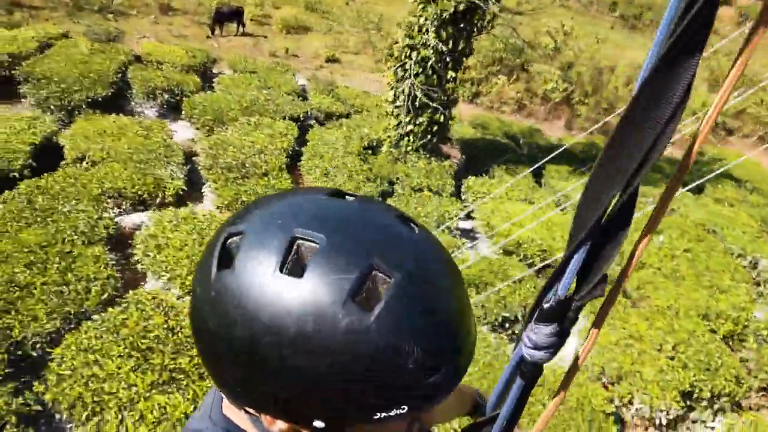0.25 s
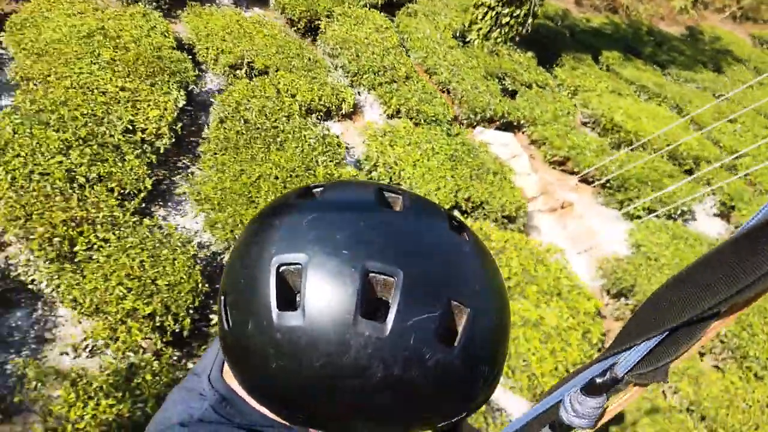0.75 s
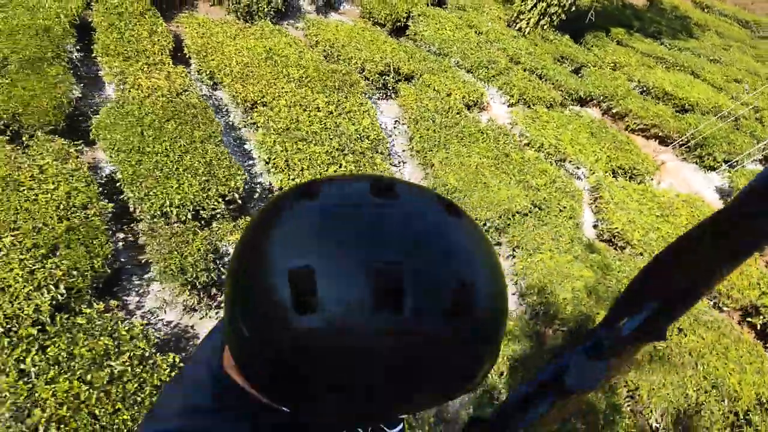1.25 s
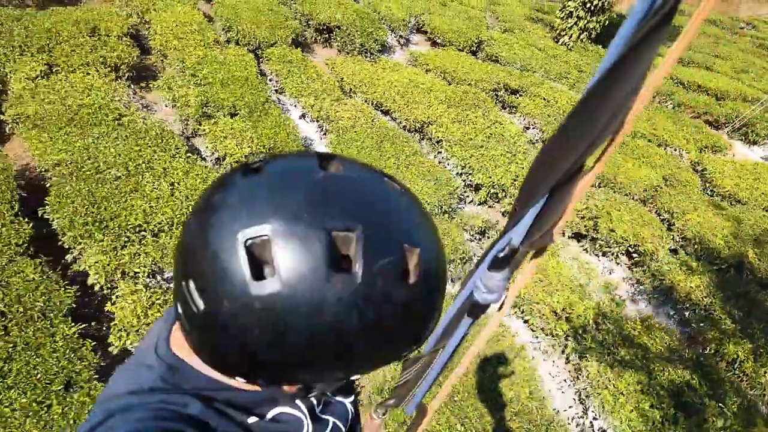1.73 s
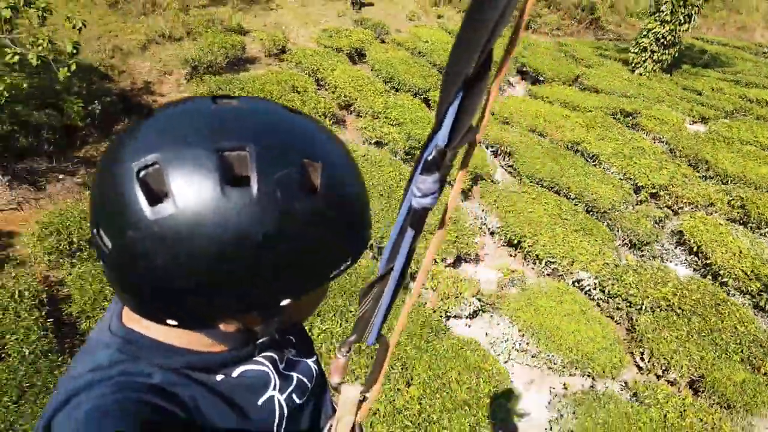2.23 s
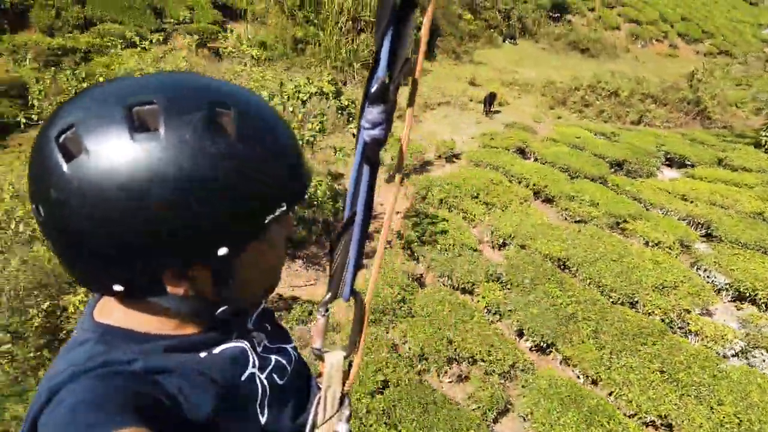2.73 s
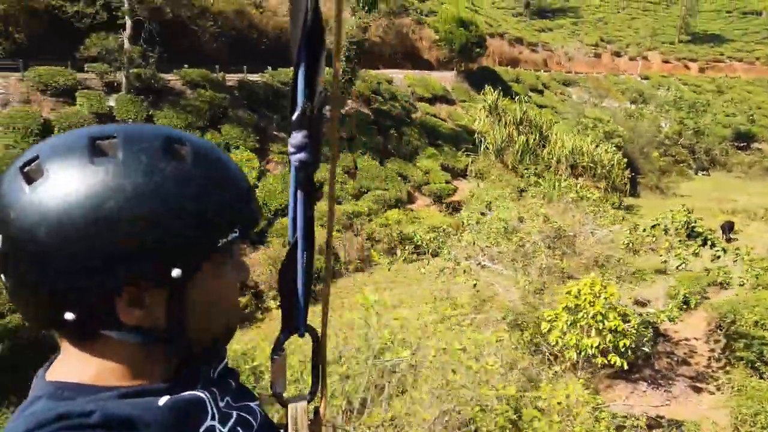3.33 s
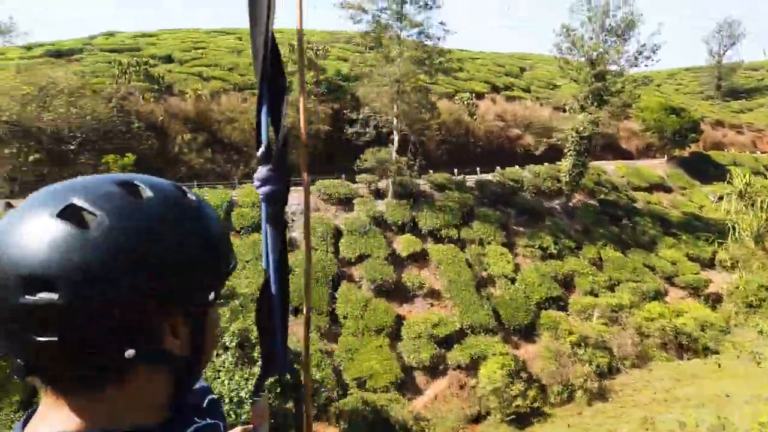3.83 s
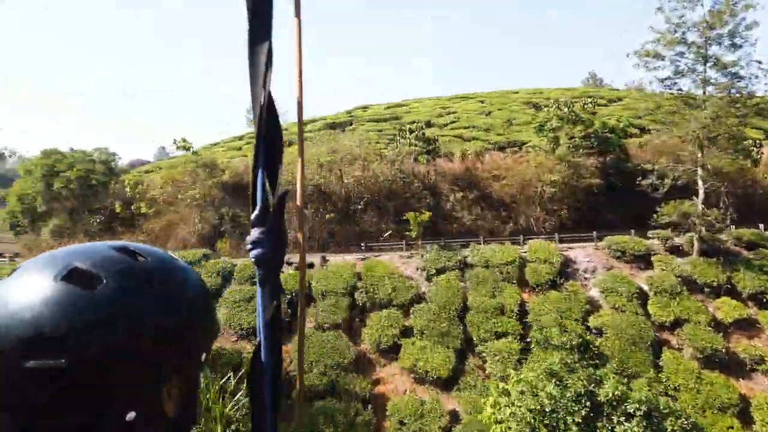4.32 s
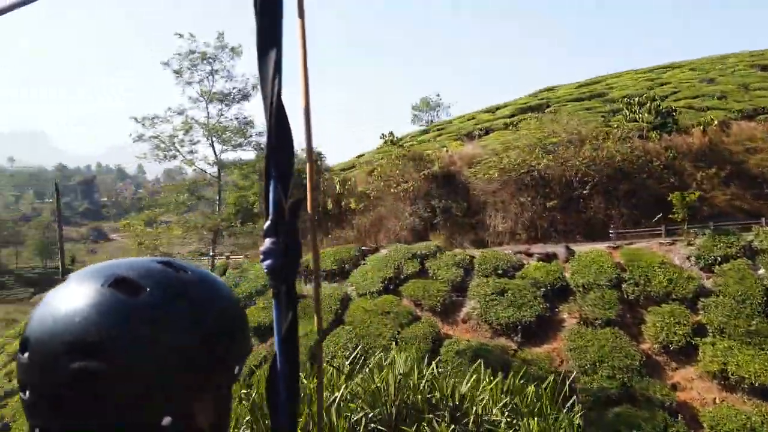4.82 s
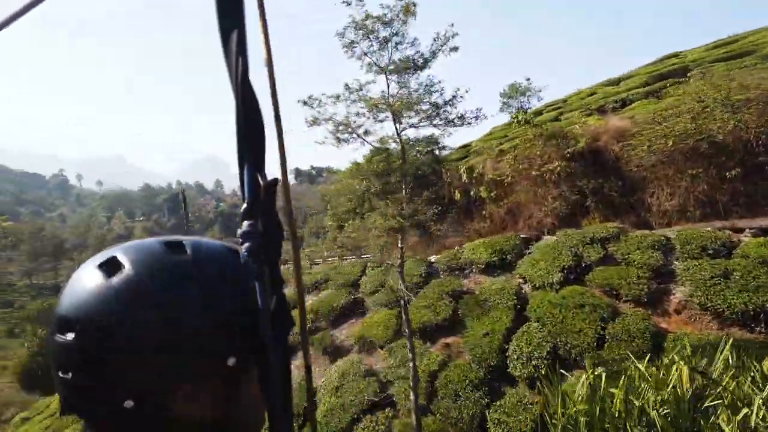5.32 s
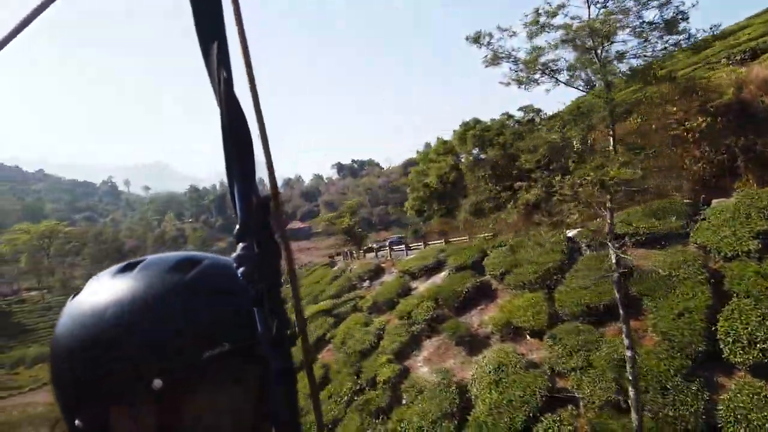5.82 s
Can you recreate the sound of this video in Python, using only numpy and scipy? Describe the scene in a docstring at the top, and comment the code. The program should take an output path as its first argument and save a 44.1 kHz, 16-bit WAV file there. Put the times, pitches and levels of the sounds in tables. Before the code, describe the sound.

Riding a zipline in open air: an unbroken, sizzling metallic hiss, wide in stereo, its colour shifting as the microphone turns. It opens under low thuds and fluttering wind, heavier on the right. After about a second the air calms, leaving hiss and a high wavering whine with a faint lower tone creeping upward. In the last second gusts thump the microphone again.

```python
"""A bright rolling hiss and thudding wind come first, then a many-toned whine as the wind drops; it returns late.
A pulley trolley rolls along a stranded steel cable above a hand-held camera that is slowly turned.
Rolling: white noise shaped by resonances of the trolley frame and camera body, with a phase at each port.
Whine: sines at whole multiples of the rate of cable lay, and one more that rises.
Wind: coloured noise in four lumpy layers, with flaps of air, at two microphone ports facing the stream."""
import sys
import numpy as np
from scipy import signal
from scipy.io import wavfile
from scipy.ndimage import uniform_filter1d

SR = 44100
rng = np.random.default_rng(int(sys.argv[2]) if len(sys.argv) > 2 else 0)


def bounce(signal):
    """Save signal as a 16-bit WAV file at the path given by the first command-line argument."""
    frames = np.transpose(np.atleast_2d(signal))
    limited = np.clip(frames, -1, 1)
    pcm = np.round(limited * 32767).astype(np.int16)
    wavfile.write(sys.argv[1], SR, pcm)


N = 267422
SIZE, HOP = 1024, 256  # samples in a short-time spectrum and between two of them
HZ, TIMES = np.fft.rfftfreq(SIZE, 1 / SR), np.arange(N // HOP + 5) * HOP / SR
T = np.arange(N) / SR

# turning of the camera: start_s, pose (held within 0 to 5)
CAMERA_POSE = [(0, -1.5), (.55, 0), (.95, 0), (1.35, 4), (1.8, 1.5), (2.38, 2.5), (2.52, 3), (3.2, 4.5),
               (3.8, 3.5), (4.5, 4.5), (4.8, 4), (5.2, 4.5), (6.06, 7)]
# strength of the rolling noise: start_s, level_db
ROLLING = [(0, -30), (0.65, -31), (0.79, -32.5), (0.9, -29), (1.15, -29.5), (1.36, -31), (1.5, -29),
           (1.85, -27.5), (2.45, -28), (2.8, -27.5), (3.05, -29), (3.5, -30), (4.2, -31), (4.4, -29.5),
           (5.2, -30.5), (5.6, -32.5), (6.06, -32)]
# brief dips of the hiss near 5 kHz: centre_s, depth_db
HISS_DIPS = [(1.81, 12), (1.978, 14), (2.178, 20), (2.294, 7)]
DIP_HZ, DIP_WIDTH_HZ, DIP_LENGTH_S = 5100, 2600, 0.031
# the hiss flares once as the camera swings
SURGE_S, SURGE_DB, SURGE_LENGTH_S, SURGE_HZ, SURGE_WIDTH_HZ = 1.27, 7, 0.06, 7600, 5100


def rolling_hiss():
    """Source-filter principle: broadband rolling noise excites resonances, partly coherent at the ports."""
    power, cross = resonances_and_ports(HZ, *curves(CAMERA_POSE, TIMES))
    db = curves(ROLLING, TIMES)[0]
    db = db + SURGE_DB * band(SURGE_HZ, SURGE_WIDTH_HZ) * bump(TIMES, SURGE_S, SURGE_LENGTH_S)
    # uneven rolling: narrow slow patches and broad quick ones, in dB rms
    db = db + 2.02 * patches(bins=4, frames=24) + 1.34 * patches(bins=100, frames=4)
    dips_db = sum(depth_db * bump(TIMES, s, DIP_LENGTH_S) for s, depth_db in HISS_DIPS)
    db = db - band(DIP_HZ, DIP_WIDTH_HZ) * dips_db

    coherence = cross / power
    left = noise()
    unrelated = np.sqrt(np.clip(1 - abs(coherence) ** 2, 0, 1))
    right = coherence.conj() * left + unrelated * noise()
    unit = np.sqrt(np.mean(sound(left) ** 2) / len(HZ))  # rms of a spectrum whose powers sum to 1
    colour = np.sqrt(power / power.sum(0))
    return sound(np.array([left, right]) * colour * gain_of(db)) / unit


# resonances of trolley and camera body: centre_hz, width_hz, level_db in each of poses 0 to 5
FRAME_RESONANCES = [(1540, 1480, -17.5, -49, -19, -22, -19, -36), (2540, 950, -34, -22, -17, -19, -6, -16),
                    (3028, 960, -4, 3.5, -7.5, -8, -4, -4), (3940, 1160, -2.5, -2, -7, -4.5, -12.5, -5.5),
                    (4636, 850, -1.5, 4, -5, -1.5, -5, -1), (5290, 1060, 0, 2, -9.5, -6.5, -1, -3),
                    (6220, 1140, -1, 1, -11, -10.5, -6, 0), (7220, 1100, -8, 1, -3.5, -9, -8, -6.5),
                    (8170, 670, -3.5, 9, -5, -5.5, -8, -3.5), (8680, 560, -14, -18, 3, -0.5, -11.5, -6.5),
                    (9360, 1800, -13.5, -36, -2, -11.5, -9.5, -19),
                    (10570, 1500, -11, -3, -6.5, -0.5, -15.5, -11),
                    (11500, 890, -17, -10, -7, -21, -10, -7), (12020, 730, -1.5, -12, -2, -7.5, -8.5, -3.5),
                    (12830, 1000, -22, 3, -13, -30, -6.5, -4.5), (13400, 1500, -8, -20, -19, -23, -23, -19),
                    (14800, 1600, -14, -16, -10, -10.5, -23, -18),
                    (16140, 1100, -28, -29, -14.5, -25, -8, -16)]
# arrival at the two ports: centre_hz, left_lead_rad in each of poses 0 to 5, coherence (0 to 1)
PORT_PHASES = [(1500, 0.5, 0.5, 0.6, 1.1, 1.2, 0.6, 0.85), (2100, 0.8, 0.1, 0.4, 0.9, 0.9, 0.6, 0.67),
               (2500, 1.1, 1.1, 1.4, 1.3, 1.2, 0.7, 0.76), (3000, 1.5, 1.6, 2.3, 1.7, 1.4, 1.4, 0.87),
               (3500, 2, 2.2, 2, 2, 1.6, 2, 0.4), (3900, 2.5, 2.5, 3, 3.2, 2.5, 2.5, 0.25),
               (4300, -3.1, -3.1, -3.0, -3.1, -3.1, -3.0, 0.9),
               (4700, -1.9, -2.8, -2.9, -2.5, -2.6, -2.0, 0.83),
               (5100, -1.6, -2.3, -0.3, -1.8, -2.2, -2.0, 0.77),
               (5600, -1.8, -1.5, 0.1, -1.0, -1.7, -1.3, 0.68),
               (6200, -1.3, -0.1, 0.4, -0.2, -0.4, -0.8, 0.86),
               (6800, -0.5, 0.1, 1.8, 0.1, 0.1, -0.1, 0.87), (7400, 0.2, 0.7, 2.2, 1.8, 0.6, 0.4, 0.63),
               (7900, 3.1, 0.1, 1.6, 1.6, 0.1, 2.8, 0.66), (8300, -2.9, -3.0, -3.5, -3.5, -3.2, -3.0, 0.87),
               (8700, -2.6, -2.9, -3.4, -3.5, -3.0, -2.8, 0.86),
               (9100, -1.1, -2.2, -2.2, -2.2, -2.2, -2.6, 0.4),
               (9600, -0.3, -0.1, -0.0, 0.0, -0.5, -1.3, 0.72),
               (10200, -0.1, -0.3, -0.3, -0.2, -0.2, -0.0, 0.86),
               (10800, -0.0, -0.1, -2.2, -0.1, -0.2, -0.0, 0.92),
               (11500, 0.2, 0.0, -0.8, 0.5, -0.5, 0.5, 0.86),
               (12200, 0.7, -0.1, -0.7, 1.1, -0.4, 0.2, 0.89),
               (13000, 0.0, -0.0, -0.1, 0.1, -0.0, 0.2, 0.96),
               (14000, 0.0, 0.0, -0.0, 0.1, 0.0, -0.0, 0.99), (14800, 1.5, 0.2, -0.9, 2.2, 1.4, 0.3, 0.69),
               (15500, 0.3, -0.0, -0.3, -0.1, 0.1, 0.0, 0.56)]


def resonances_and_ports(hz, pose):
    """Modal superposition: power and left-right cross power at hz (rows) for each pose (columns)."""
    frame, ports, poses = np.array(FRAME_RESONANCES), np.array(PORT_PHASES), np.arange(6)
    offset = 2 * (hz[:, None] - frame[:, 0]) / frame[:, 1]
    shape = 1 / (1 + offset ** 2) ** 2
    power = shape @ np.array([gain_of(np.interp(pose, poses, row[2:])) ** 2 for row in frame])
    coherence = np.array([row[-1] * np.exp(1j * np.interp(pose, poses, row[1:-1])) for row in ports])
    between = np.array([np.interp(hz, ports[:, 0], one) for one in np.eye(len(ports))]).T
    return power, power * (between @ coherence)


# turns of the cable lay passing the wheel, as the ride slows: start_s, lay_rate_hz
LAY_RATE = [(0, 131.4), (1.1, 129.9), (1.4, 130.0), (2.3, 128.8), (2.7, 127.9), (3.4, 126.95), (3.6, 127.1),
            (3.8, 126.5), (4.1, 126.7), (4.4, 126.0), (4.6, 125.2), (5.0, 125.05), (5.3, 124.9),
            (6.06, 123.6)]
# strand orders: order (multiple of the lay rate), level_db (before the levels over time)
STRAND_ORDERS = [(6, -58), (10, -63), (11, -56), (12, -47), (13, -58), (18, -52), (19, -51), (22, -50),
                 (23, -45), (24, -46), (25, -47), (29, -55), (30, -52), (36, -49), (37, -48), (40, -50),
                 (42, -48), (43, -48)]
# levels over time: start_s, low_orders_db, high_orders_db, rising_whine_db
WHINE_LEVELS = [(0, -15, -9, -49), (.6, -9.5, -9, -55), (1.15, -10.5, -3.5, -57.5), (1.4, -7.5, -8, -56),
                (1.8, -4, -9, -53), (2.1, -8, -7, -55), (2.5, -10, -4.5, -52.5), (2.75, -2.5, -0.5, -49.5),
                (3.0, -3, -4.5, -48), (3.25, 0.5, 0, -42.5), (3.4, 0, -4, -49.5), (3.6, 1, -3, -43.5),
                (3.75, -1, -1.5, -46.5), (4.0, -4, -3.5, -51), (4.3, -5, -8, -48), (4.65, -1, -5, -49),
                (5.0, -8, -4.5, -55.5), (5.35, -14.5, -13.5, -57), (6.06, -12, -6, -53)]
HIGH_ORDER = 15  # the high orders start here
WHINE_FUZZ_RAD, WHINE_WAVER_DB, HIGH_WAVER_DB = .3, 1.2, 2.2  # rms wander of phase and level
# a narrow resonance lifts nearby orders and shifts as the camera turns: start_s, centre_hz
MOVING_RIDGE = [(0, 3130), (1, 3140), (2.2, 3200), (2.7, 3050), (3.3, 3020), (3.8, 2830), (4.4, 2820),
                (5, 2930), (6.06, 3000)]
RIDGE_DB, RIDGE_WIDTH_HZ = 4, 260
# the rising whine: start_s, pitch_hz
RISING_PITCH = [(0, 712), (1, 724), (1.8, 741), (3.45, 762), (4.5, 765), (6.06, 786)]
# the rising whine crosses to the right: start_s, left_minus_right_db
RISING_BALANCE = [(2.4, 5), (3.4, 0), (4.7, -0.5), (5.2, -14)]
# brief drops of the rising whine: centre_s, depth_db
RISING_BREAKS = [(1.42, 16), (1.93, 12), (2.27, 10), (3.14, 12), (3.69, 8), (4.09, 14), (4.38, 14),
                 (4.76, 12), (4.84, 12)]
BREAK_LENGTH_S = 0.05


def cable_whine():
    """Order excitation: periodic strands sound multiples of the lay rate, with port phases as in the hiss."""
    order, order_db = np.transpose(STRAND_ORDERS)
    low_db, high_db, rising_db = curves(WHINE_LEVELS, T)
    rising_db = rising_db - sum(db * bump(T, s, BREAK_LENGTH_S) for s, db in RISING_BREAKS)
    speed_waver = 1 + .0005 * np.interp(T, TIMES, drift(6, TIMES))
    lay = curves(LAY_RATE, T)[0] * speed_waver
    cross = resonances_and_ports(order * lay.mean(), *curves(CAMERA_POSE, TIMES))[1]
    lead = [np.interp(T, TIMES, row) for row in np.unwrap(np.angle(cross))]

    # the rising whine borrows most of the lowest order's phase lead
    rising = tone(*curves(RISING_PITCH, T), rising_db, .8 * lead[0], fuzz=.35, waver_db=.7)
    out = rising * gain_of(np.outer([.5, -.5], *curves(RISING_BALANCE, T)))
    ridge_hz = curves(MOVING_RIDGE, T)[0]
    for k, k_db, k_lead in zip(order, order_db, lead):
        db, waver_db = (low_db, WHINE_WAVER_DB) if k < HIGH_ORDER else (high_db, HIGH_WAVER_DB)
        db = db + RIDGE_DB * bump(k * lay, ridge_hz, RIDGE_WIDTH_HZ)
        out += tone(k * lay, db + k_db, k_lead, WHINE_FUZZ_RAD, waver_db)
    return out


def tone(hz, db, lead, fuzz, waver_db):
    """Phase accumulation: a wavering sine of rms level db, the left port ahead by lead radians."""
    wander = fuzz * drift(25, T[::64]).repeat(64)[:N]
    turn = 2 * np.pi * (np.cumsum(hz) / SR + rng.random()) + wander
    level = np.sqrt(2) * gain_of(db + waver_db * np.interp(T, TIMES, drift(14, TIMES)))
    return level * np.sin([turn + lead / 2, turn - lead / 2])


# sharpest flaps, before their envelope and the balance of the ports: start_s, level_db
SHARP_FLAPS = [(0.019, -25), (0.085, -29), (0.118, -23), (0.188, -28), (0.205, -25), (0.231, -36),
               (0.286, -23.5), (0.400, -25), (0.432, -27.5), (0.461, -33), (0.492, -28), (0.533, -35),
               (0.55, -26.5), (0.572, -30), (0.585, -43), (0.729, -34.5), (0.82, -29.5), (0.87, -28),
               (0.931, -44), (5.132, -32.5), (5.169, -36), (5.377, -31), (5.399, -31.5), (5.567, -36),
               (5.602, -24), (5.663, -25), (5.676, -24.5), (5.742, -35), (5.774, -27.5), (5.851, -29.5),
               (5.908, -24), (5.964, -26.5), (5.998, -27), (6.014, -23)]
# colour of the rustle: frequency_hz, relative_level_db (per Hz)
FLAP_COLOUR = [(100, -5), (300, -1.5), (800, -0.5), (1600, -10), (2600, -13.5), (5000, -55)]
SMALL_FLAPS_PER_S, SMALL_FLAP_DB = 30, -8.5  # lesser flaps come by chance, this far under the buffeting
POP_S, POP_DB = 0.00261, 12  # time scale of the pop, and its strength before the balance of the ports


def air_flaps():
    """Impulsive excitation: a pop of pressure, push or pull, and a rustle; the left port is sheltered."""
    t = np.arange(1500) / SR
    by_chance = rng.random(N) < SMALL_FLAPS_PER_S / SR
    hits = gain_of(curves(WIND_STREAM, T)[1] + SMALL_FLAP_DB) * by_chance
    s, db = np.transpose(SHARP_FLAPS)
    hits[(s * SR).astype(int)] = gain_of(db)

    rustle_shape = (1 - np.exp(-t / 0.0015)) * np.exp(-t / 0.0082)
    u = (np.pi * (t - POP_S) / POP_S) ** 2
    pop_shape = gain_of(POP_DB) * (1 - u) * np.exp(-u)  # one swing with a dip on either side
    pops = signal.oaconvolve(hits * rng.choice([-1., 1.], N), pop_shape)[:N]
    colour = gain_of(read(FLAP_COLOUR, HZ))[:, None]
    air = evened(sound(np.array([colour * noise(), colour * noise()])))
    rustle = air * signal.oaconvolve(hits, rustle_shape)[:N]
    return gain_of([[-1], [2]]) * rustle + gain_of([[-7], [-1]]) * pops  # dB of left, right


# the ports turn out of the air stream and back into it: start_s, rumble_db, buffeting_db
WIND_STREAM = [(0, -28, -27.5), (.55, -50, -29), (.66, -32, -36), (.78, -30.5, -31), (1.0, -37, -32),
               (1.09, -52, -35.5), (1.16, -52, -42), (1.21, -51, -53), (1.5, -56, -51), (2.0, -54.5, -57.5),
               (3.3, -52.5, -62.5), (4.7, -56.5, -70), (5.03, -47.5, -68), (5.12, -46, -37),
               (5.3, -31, -42), (5.5, -33, -32.5), (5.65, -31, -29), (5.8, -34.5, -27.5),
               (6.06, -35, -33.5)]
# single gusts added to the power of the stream: centre_s, rumble_db, buffeting_db
WIND_GUSTS = [(.4, -27, -35), (0.569, -44, -25.5), (.885, -32, -29.5), (1.49, -62, -51), (2.23, -43, -54),
              (2.53, -62, -47), (2.97, -50, -70), (3.19, -45, -48), (3.39, -47, -63), (4.03, -48, -58),
              (4.22, -51, -62), (4.794, -32, -49.5), (5.18, -30, -40.5), (5.39, -38, -30),
              (5.605, -36, -28.5), (5.685, -38, -45), (5.89, -27, -30), (6.009, -34, -27)]
GUST_RISE_S, GUST_FALL_S, GUST_TOP_SHARE = 0.03, 0.032, 1.5
# the hissy top follows the buffeting by a share, from its full level
TOP_DB, TOP_FOLLOWS, BUFFET_FULL_DB = -43.5, 0.62, -23.5


def wind_levels():
    """Energy addition: stream and gust powers sum to the dB of rumble and buffeting, which the top follows."""
    stream = np.array(curves(WIND_STREAM, TIMES))
    power = gain_of(stream) ** 2
    for s, *gust_db in WIND_GUSTS:
        shape = bump(TIMES, s, 2 * np.where(TIMES < s, GUST_RISE_S, GUST_FALL_S))
        power = power + np.outer(gain_of(gust_db) ** 2, shape)
    rumble, buffet = 10 * np.log10(power)
    gust_lift = buffet - stream[1]
    top = TOP_DB + TOP_FOLLOWS * (stream[1] - BUFFET_FULL_DB) + GUST_TOP_SHARE * TOP_FOLLOWS * gust_lift
    return [np.interp(T, TIMES, db) for db in (rumble, buffet, top)]


# colours of the four layers, each: frequency_hz, relative_level_db (per Hz)
RUMBLE_COLOUR = [(10, -7), (25, 7.5), (50, -10.5), (100, -14.5), (150, -12), (300, -23), (1000, -98)]
BUFFET_COLOUR = [(50, -0.5), (110, 2.5), (200, 3.5), (350, 0), (550, -8), (800, -18.5), (1500, -25),
                 (4000, -82)]
TOP_COLOUR = [(200, -1), (600, 2), (900, -1), (1350, -11.5), (2000, -19.5), (2800, -3.5), (4000, -26),
              (8000, -82)]
SWAY_COLOUR = [(10, -11.5), (30, -7), (55, -11), (120, -37), (1000, -90)]
SWAY_DB = -52.5  # the low sway of the air never stops
# difference between the ports: frequency_hz, side_minus_mid_db
WIND_SIDE_LEVEL = [(50, 0), (110, -1), (200, -4), (400, -5), (800, -3), (1500, -3)]


def wind():
    """Turbulent pressure fluctuation: four noise layers, lumpy together, partly unrelated at the ports."""
    shared, *own = uniform_filter1d(uniform_filter1d(rng.standard_normal((3, N)), 260), 260)
    lumps = evened(shared + 0.88 * np.array(own))  # eddies strike each port a little differently
    rumble_db, buffet_db, top_db = wind_levels()
    # colour, level in dB, lumpiness in dB rms, dB raised on the right and lowered on the left
    layers = [(RUMBLE_COLOUR, rumble_db, 1.9, 0.15), (BUFFET_COLOUR, buffet_db, 2.54, .3),
              (TOP_COLOUR, top_db, 4.2, 0.2), (SWAY_COLOUR, SWAY_DB, 4, 0)]
    side_gain = gain_of(read(WIND_SIDE_LEVEL, HZ))[:, None]
    out = np.zeros((2, N))
    for spectrum, db, lumpy_db, pan_db in layers:
        colour = gain_of(read(spectrum, HZ))[:, None]
        mid, side = sound(np.array([colour * noise(), colour * side_gain * noise()]))
        scale = evened(gain_of(lumpy_db * lumps)) * gain_of(db) / np.sqrt(np.mean(mid ** 2))
        out += scale * gain_of([[-pan_db], [pan_db]]) * np.array([mid + side, mid - side])
    return out


def gain_of(db):
    """Decibel law: the amplitude ratio of a level."""
    return 10 ** (np.asarray(db) / 20)


def evened(x):
    """Normalisation to an rms of 1."""
    return x / np.sqrt(np.mean(abs(x) ** 2) + 1e-20)


def read(points, hz):
    """Interpolation of a spectrum, straight on a log-frequency axis."""
    f, value = np.transpose(points)
    return np.interp(np.log(hz + 1), np.log(f + 1), value)


def curves(rows, t):
    """Linear interpolation over time of each column after the first."""
    s, *columns = np.transpose(rows)
    return [np.interp(t, s, c) for c in columns]


def drift(rate, t):
    """Random-phase superposition: slow chance of rms 1, from sines up to rate in Hz."""
    rates = np.geomspace(rate / 12, rate, num=24)
    return evened(sum(np.sin(2 * np.pi * (f * t + rng.random())) / f ** 0.013 for f in rates))


def noise():
    """White noise: independent Gaussian values in every bin and frame."""
    a, b = rng.standard_normal((len(TIMES), len(HZ), 2)).T
    return a + 1j * b


def patches(bins, frames):
    """Moving average: a random field, smooth over so many bins and frames."""
    field = rng.standard_normal((len(TIMES), len(HZ))).T
    return evened(uniform_filter1d(uniform_filter1d(field, round(bins), 0), round(frames), 1))


def sound(z):
    """Overlap-add synthesis: short-time spectra become a waveform."""
    return signal.istft(z, nperseg=SIZE, noverlap=SIZE - HOP)[1][..., :N]


def bump(t, s, length):
    """Gaussian window: a smooth swell of height 1 around s."""
    return np.exp(-(2 * (t - s) / length) ** 2)


def band(hz, width_hz):
    """Super-Gaussian window: a flat-topped band of height 1."""
    return np.exp(-((2 * (HZ[:, None] - hz) / width_hz) ** 2) ** 2)


def scene():
    """Linear superposition of the trolley, the cable and the moving air."""
    return rolling_hiss() + cable_whine() + wind() + air_flaps()


def record(dry):
    """Low-pass filtering: the band limit of the recorder."""
    lowpass = signal.firwin(1023, 15740, window=("kaiser", 9), fs=SR)  # edge in Hz
    return signal.oaconvolve(dry, lowpass[None], "same")


dry = scene()
out = record(dry)
bounce(out)
```